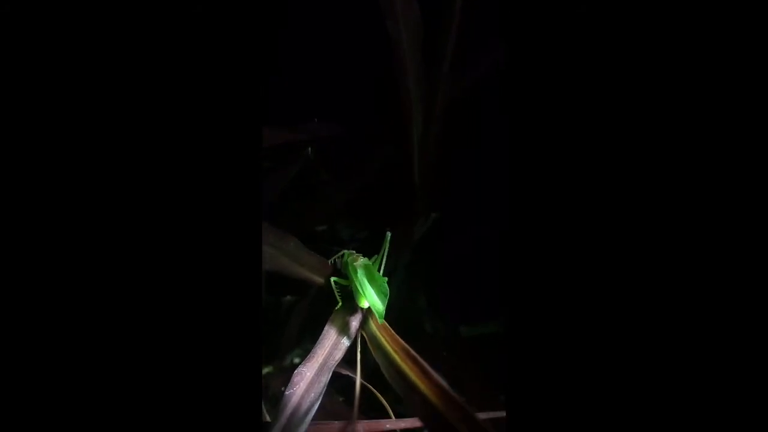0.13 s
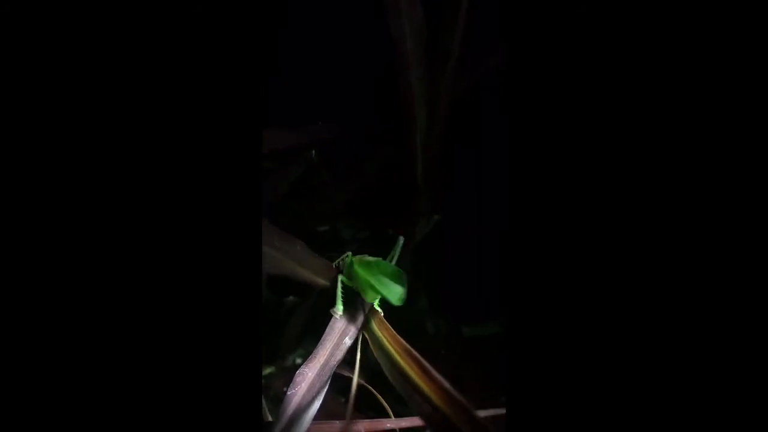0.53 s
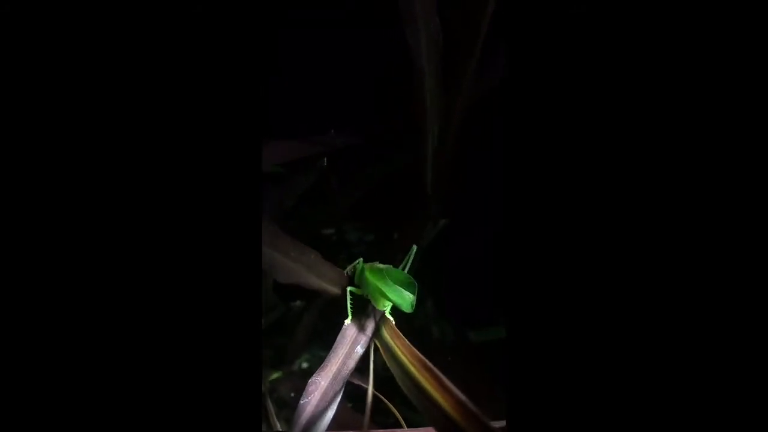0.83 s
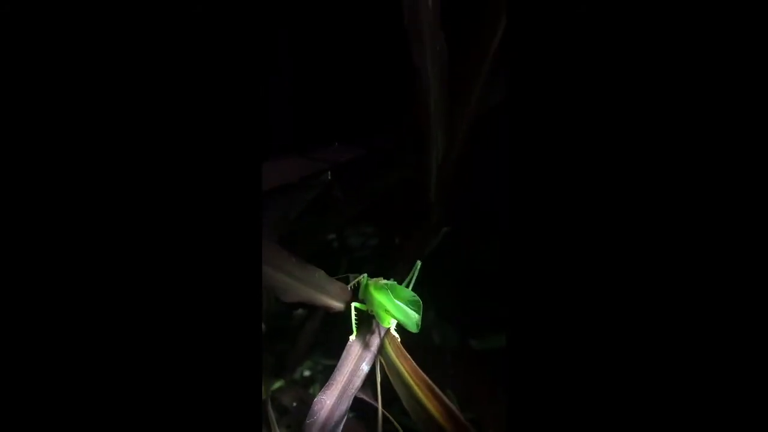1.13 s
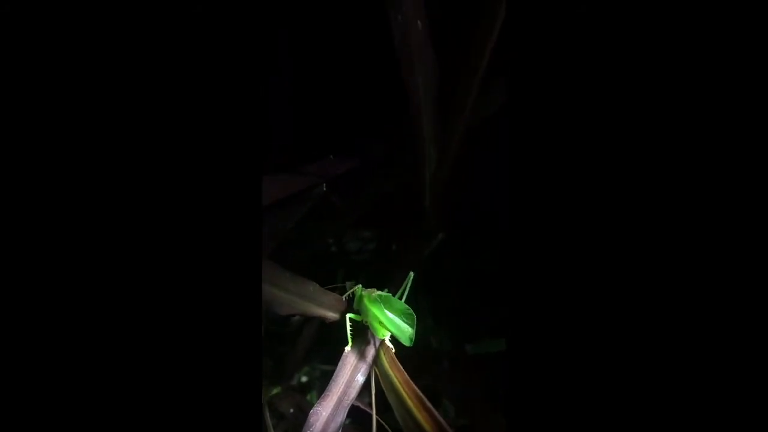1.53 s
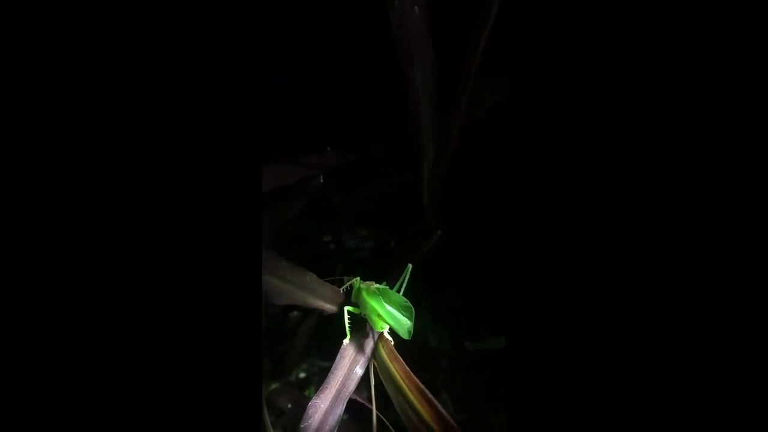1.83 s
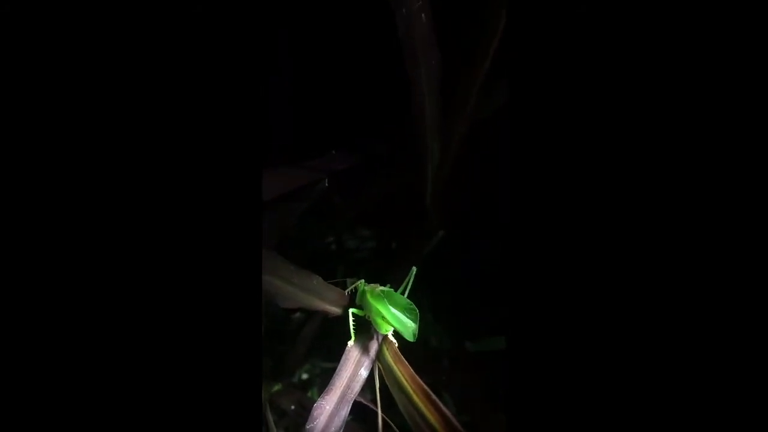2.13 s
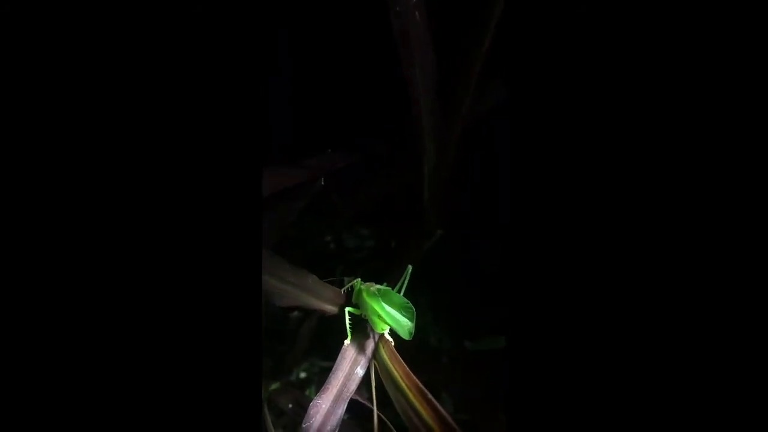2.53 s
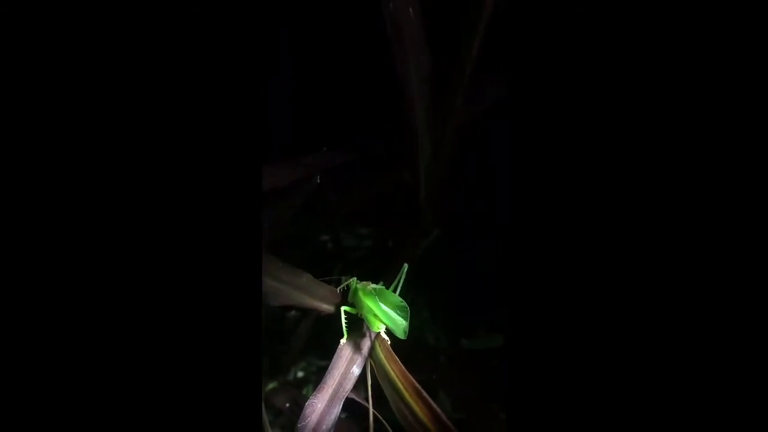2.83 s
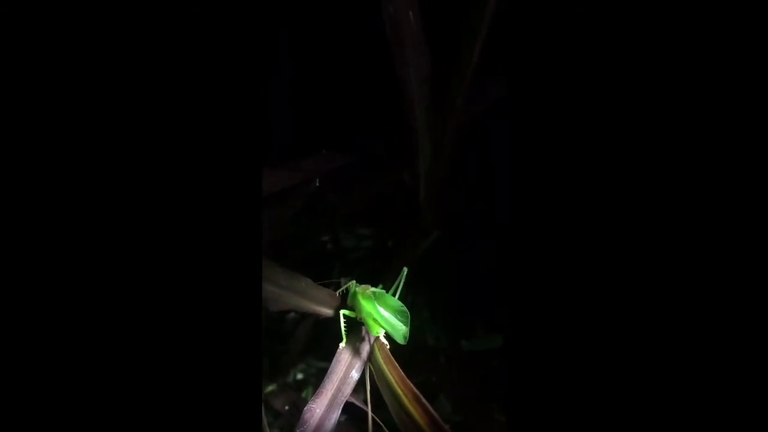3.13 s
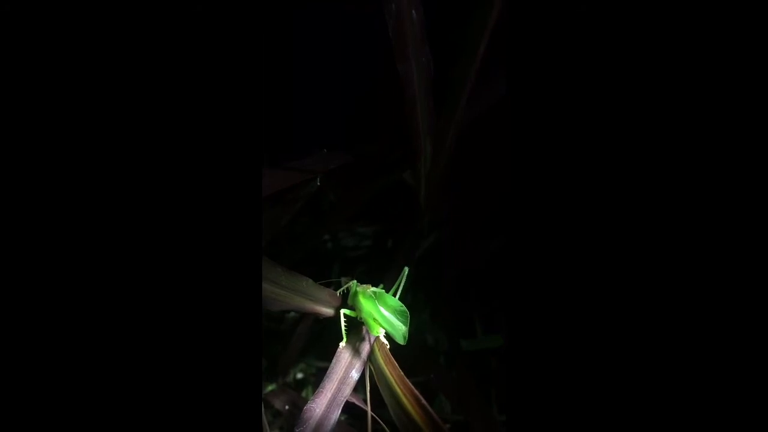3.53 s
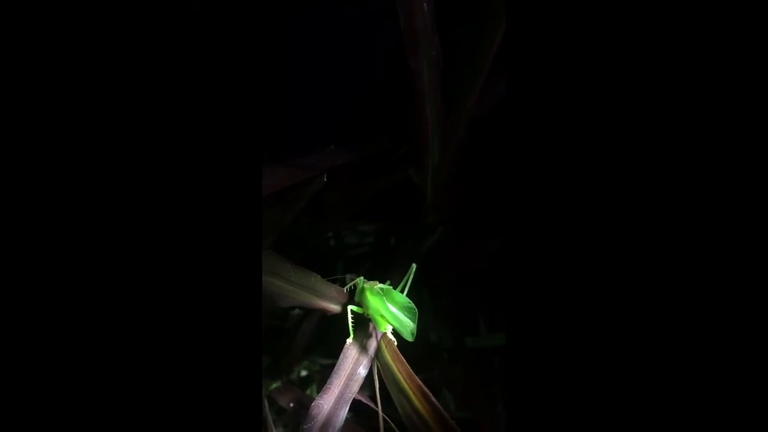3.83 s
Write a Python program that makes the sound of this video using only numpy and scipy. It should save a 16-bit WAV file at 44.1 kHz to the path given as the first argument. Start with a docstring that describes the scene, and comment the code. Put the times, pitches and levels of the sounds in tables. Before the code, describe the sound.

A bush cricket rasps close by at night, in five short, harsh, very high bursts at about 0.5, 1.3, 1.9, 2.5 and 3.1 seconds. Each scrape builds to a sharp ring, followed by tiny wing ticks. Faint distant insects trill over a low rumble and hum throughout, dipping with each rasp and swelling back. After a last tick near 3.4 seconds, only this background remains.

```python
"""A bush cricket on a leaf at night. From the outset, far insects trill over a low rumble and hum.
At half a second comes the first of five close rasps, each one wing stroke: the scraper skims the file,
bites and makes the wing ring tooth by tooth, then slips off the end. Automatic gain control ducks the
background with every rasp; the wings tick as they part and reset, and the background swells back.
After the last stroke, at about 3.2 seconds, and its ticks, the far insects and the rumble remain."""
import sys
import numpy as np
from scipy import signal
from scipy.fft import rfft, irfft, next_fast_len
from scipy.io import wavfile
from scipy.ndimage import uniform_filter1d, minimum_filter1d

SR = 44100
rng = np.random.default_rng(int(sys.argv[2]) if len(sys.argv) > 2 else 0)


def inscribe(sig):
    """Save sig as 16-bit PCM at rate SR to the path in sys.argv[1].

    A 1-D sig is mono; a 2-D sig holds one channel per row.
    Samples are clipped to [-1, 1] before scaling.
    """
    pcm = np.round(np.clip(np.atleast_2d(sig).T, -1, 1) * 32767)
    wavfile.write(sys.argv[1], SR, pcm.astype(np.int16))


N = 176400
T = np.arange(N) / SR

# Wing strokes. Each row: start, bite and end in seconds, teeth per second.
WING_STROKES = [(.505, .5782, .6385, 347.6), (1.341, 1.4138, 1.4798, 347.6),
                (1.9115, 1.9905, 2.0571, 344.4), (2.4815, 2.5658, 2.6245, 342.7),
                (3.0855, 3.1759, 3.2403, 342.8)]
# Course of a stroke. Each row: stage (0 start, 1 bite, 2 end), scrape in dB, ring in dB, pitch in Hz.
STROKE_COURSE = [(0, -27, -60, 6600), (.1, -20.5, -53.5, 6500), (.36, -14, -37, 6600),
                 (.65, -14.5, -38, 6400), (.88, -9, -29, 6270), (1.03, -7.5, -25.5, 7000),
                 (1.13, -2.5, -11.5, 9500), (1.22, -5.5, -10, 10300), (1.351, -9, 0.5, 11000),
                 (2, -4, 2, 11180)]
# Spectra of the wing's four kinds of contact. Each row: frequency in Hz, gain in dB.
SCRAPE_SPECTRUM = [(900, -16.5), (2100, -12.5), (3300, -15), (5000, -11), (6500, -5), (8000, -3.5),
                   (9500, 1.5), (11500, 3), (12800, 3.5), (14500, 6.5), (16000, 2)]
SNAP_SPECTRUM = [(1200, -32.5), (2800, -25.5), (4300, -17), (5800, -23), (7500, -18.5), (9500, 1.5),
                 (12000, -10), (12800, -13), (14000, 7.5), (15700, -3.5)]
SLIP_SPECTRUM = [(700, -24.5), (1400, -1.5), (3000, -7.5), (4500, -4.5), (7000, -30.5), (14000, -49)]
TICK_SPECTRUM = [(1500, -31.5), (3500, -32.5), (5200, -16), (6700, -15), (8000, -17), (9300, -6.5),
                 (11200, -6.5), (12800, -10), (14000, -2.5), (15200, 1.5), (16500, -5.5)]
# Wing ticks. Each row: time in seconds, then click, main resonance and low resonance in dB.
WING_TICKS = [(0.0127, 2.5, -27, -41), (.1515, 2, -16.5, -22), (.682, 6.5, -7, -53), (1.511, 3.5, -36, -45),
              (1.6432, 2.5, -15.5, -21.5), (2.0884, 3.5, -34, -45), (2.2317, 3, -15.5, -20),
              (2.6558, 3.5, -31, -55), (2.798, 2, -15, -21.5), (3.2694, 3, -38, -52),
              (3.4066, 1, -16, -21.5)]
# A second insect's trills. Each row: start and end in seconds, final level in dB.
SWELLING_TRILLS = [(-.18, .207, -62.5), (0.825, 1.217, -60), (1.897, 2.283, -60.5), (2.894, 3.365, -63)]
# A far tree cricket's trills. Each row: middle and length in seconds, level in dB.
SOFT_TRILLS = [(.24, .36, -63), (1.683, 0.36, -63.5), (2.904, 0.21, -62.5)]
# Far insect choirs and hum. Each row: centre and width in Hz, level and flutter in dB.
CHOIR_BANDS = [(3403, 280, -72.5, 2), (4546, 220, -70, 3)]
HUM_BANDS = [(51.9, 13.3, -48.5, 0.5), (107, 8.9, -42, 1), (131.65, 7, -42.5, 1.5), (205, 15, -48, 1.5)]
# Night air and distant rumble. Each row: frequency in Hz, relative spectral density in dB.
AIR_SPECTRUM = [(20, -37), (32, -49), (48, -1), (75, 1.5), (125, -2.5), (170, -5), (250, -7.5), (400, -20),
                (650, -19), (980, -14.5), (1250, -18.5), (1600, -19.5), (2200, -28.5), (3000, -39),
                (4000, -46.5), (6300, -48.5), (8500, -54.5), (12500, -56), (16000, -57)]

RING_S, RING_RISE_HZ = .00098, 1400   # length of one tooth's ring and its upward glide


def rasps(snap_db=2, slip_s=.0082, slip_db=-27.5):
    """Stridulation: each tooth scrapes, snaps free and rings the wing; a rough slip ends the stroke."""
    strokes = [tooth_strikes(*row) for row in WING_STROKES]
    friction = sum(scrapes(rows[:, 0] - RING_S / 2, rows[:, 1]) for rows in strokes)
    times, _, ring_db, hz = np.vstack(strokes).T
    snaps = place(times, ring_db + snap_db, click)
    rings = place(times, ring_db, wing_ring(hz[:, None]))
    slip_envelope = sum(np.exp(-(2 * (T - end) / slip_s) ** 2) for _, _, end, _ in WING_STROKES)
    slips = from_db(slip_db) * coloured(slip_envelope * rng.standard_normal(N), SLIP_SPECTRUM)
    return coloured(friction, SCRAPE_SPECTRUM) + coloured(snaps, SNAP_SPECTRUM) + rings + slips


def tooth_strikes(start, bite, end, rate, skim_slower=.06, run_out_db_per_s=2300):
    """Wing speed sets the tooth rate. Each row: time in seconds, scrape and ring in dB, pitch in Hz."""
    times = end - np.arange(-4, 60) / rate   # four teeth run on past the end, without ringing
    skim = np.clip((bite - times) / (bite - start), 0, 1)
    times -= .5 * skim_slower * (bite - start) * skim ** 2   # quickening until the bite
    jitter, scrape_spread, ring_spread = rng.standard_normal((3, len(times)))
    times += jitter * np.where(skim > 0, 1.2e-5, 6e-6)
    stage = np.interp(times, [start, bite, end], [0, 1, 2])
    stages, *curves = np.transpose(STROKE_COURSE)
    scrape_db, ring_db, hz = (np.interp(stage, stages, curve) for curve in curves)
    past_end = times > end + .5 / rate
    run_out_db = -3.5 - run_out_db_per_s * (times - end - 1 / rate)
    scrape_db = np.where(past_end, run_out_db, scrape_db) - scrape_spread
    ring_db = np.where(past_end, -np.inf, ring_db) - .5 * ring_spread
    return np.column_stack([times, scrape_db, ring_db, hz])[times > start]


def scrapes(times, db, drag_s=.003, fresh_share=.44):
    """Friction: each tooth drags out a noise burst, part common to the stroke and part its own."""
    t = T[:256]
    window = np.sin(np.pi * np.minimum(t / drag_s, 1) ** .36) ** 2
    window /= np.linalg.norm(window)
    phases = np.angle(rfft(window * rng.standard_normal(len(t))))
    grain = irfft(np.exp(1j * phases), len(t)) * window ** .5
    strikes = place(times, db, click)
    common = signal.oaconvolve(strikes, grain / np.linalg.norm(grain))[:N]
    fresh = signal.oaconvolve(strikes, window)[:N] * rng.standard_normal(N)
    return np.sqrt(1 - fresh_share) * common + np.sqrt(fresh_share) * fresh


def wing_ring(hz):
    """Resonance: the struck wing gives a brief rising tone, returned as a function of time."""
    def shape(t):
        envelope = np.cos(np.pi * np.clip(t / RING_S, -.5, .5)) ** 3
        return envelope * np.sin(2 * np.pi * t * (hz + .5 * RING_RISE_HZ * t / RING_S))
    return shape


def click(t):
    """A sharp contact approximates an impulse, with a flat spectrum."""
    return np.sinc(t * SR) * np.exp(-(t * SR / 10) ** 2)


def wing_ticks(main_hz=11100, low_hz=7060):
    """Impact excitation: single contacts ring two resonances as the wings part and settle."""
    times, click_db, main_db, low_db = np.transpose(WING_TICKS)
    contacts = coloured(place(times, click_db, click), TICK_SPECTRUM)
    return contacts + place(times, main_db, wing_ring(main_hz)) + place(times, low_db, wing_ring(low_hz))


def among_leaves(x):
    """Scattering: the nearest leaves add a short tail, the foliage a faint longer one."""
    t = T[:SR // 2]
    response = 1. * (t == 0)
    for db, t60_s in (-13.5, .0099), (-39, .22):
        tail = rng.standard_normal(len(t)) * from_db(-60 * t / t60_s) * (t > RING_S)
        response += from_db(db) * tail / np.linalg.norm(tail)
    return signal.fftconvolve(x, response)[:N]


def swelling_trills(swell_db=16.5, octave_db=-20):
    """Amplitude modulation: a fast-pulsed tone and its octave swell exponentially and stop dead."""
    pulses, phase = falling_notes(hz=7340, fall_hz=450, per_s=182, waver=.015, duty=.98)
    swell = np.zeros(N)
    for start, end, db in SWELLING_TRILLS:
        remaining = np.clip((end - T) / (end - start), 0, 1)
        swell += from_db(db - swell_db * remaining) * (T > start) * (T < end)
    return swell * pulses * rms_one(np.sin(phase) + from_db(octave_db) * np.sin(2 * phase))


def far_cricket(db=-69):
    """Random amplitude modulation makes a train of soft falling chirps uneven."""
    notes, phase = falling_notes(hz=4604, fall_hz=645, per_s=18, waver=.08, duty=.75)
    return from_db(db) * rms_one(notes * np.sin(phase) * from_db(2 * drift(8.7)))


def tree_cricket(waver_hz=109):
    """Random frequency modulation broadens the tone of soft trills that fade in and out."""
    pulses, phase = falling_notes(hz=4630, fall_hz=250.4, per_s=38, waver=.101, duty=1)
    phase += 2 * np.pi * np.cumsum(waver_hz * drift(115.6)) / SR
    level = sum(from_db(db) * np.exp(-(2 * (T - middle) / length) ** 4)
                for middle, length, db in SOFT_TRILLS)
    return level * rms_one(np.sqrt(pulses) * np.sin(phase))


def falling_notes(hz, fall_hz, per_s, waver, duty):
    """Envelope and phase of repeated downward glides; phase is the integral of frequency."""
    cycles = np.cumsum(per_s * (1 + waver * drift(3))) / SR
    progress = np.minimum(cycles % 1 / duty, 1)
    pitch = hz + fall_hz * (.5 - progress) + .008 * hz * drift(150)
    return rms_one(np.sin(np.pi * progress) ** 2), 2 * np.pi * np.cumsum(pitch) / SR


def night(air_db=-38.5, hiss_db=-60):
    """Incoherent addition: massed insects merge into noise bands over the air and distant hum."""
    air = from_db(air_db) * rms_one(coloured(rng.standard_normal(N), AIR_SPECTRUM))
    bands = np.zeros(N)
    for hz, width, db, flutter_db in CHOIR_BANDS + HUM_BANDS:
        band = noise_band(hz - width / 2, hz + width / 2)
        bands += from_db(db) * rms_one(band * from_db(flutter_db * drift(7.5)))
    bush_crickets = from_db(hiss_db + .23 * drift(60)) * noise_band(9560, 11160, order=4)
    return air + bands + bush_crickets


def noise_band(low_hz, high_hz, order=2):
    """Band-pass filtering of white noise, at unit rms."""
    sos = signal.butter(order, [low_hz, high_hz], "band", fs=SR, output="sos")
    return rms_one(signal.sosfilt(sos, rng.standard_normal(N + SR))[SR:])


def drift(rate_hz):
    """Low-pass filtered noise wanders slowly, with a spread of about 1."""
    pole = np.exp(-80 * np.pi * rate_hz / SR)   # one step per 40 samples
    slow = signal.lfilter([1], [1, -2 * pole, pole * pole], rng.standard_normal(N // 40 + 2002))[2000:]
    return np.interp(np.arange(N) / 40, np.arange(len(slow)), rms_one(slow))


def coloured(x, spectrum):
    """Minimum-phase filtering: folding the cepstrum makes the given spectrum causal."""
    hz, db = np.transpose(spectrum)
    size = next_fast_len(N + SR // 2, real=True)
    bin_hz = np.maximum(np.arange(size // 2 + 1) * SR / size, 1)
    gain = from_db(np.interp(np.log(bin_hz), np.log(hz), db))
    cepstrum = irfft(np.log(gain), size)
    cepstrum[1:size // 2] *= 2
    cepstrum[size // 2 + 1:] = 0
    return irfft(rfft(x, size) * np.exp(rfft(cepstrum)), size)[:N]


def place(times, db, shape):
    """Superposition of a short shape (a function of seconds from its centre) at exact times."""
    index = (times * SR).astype(int)[:, None] + np.arange(-64, 64)
    waves = from_db(db)[:, None] * shape(index / SR - times[:, None])
    return np.bincount(np.clip(index, 0, N).ravel(), waves.ravel(), N + 1)[:N]


def from_db(db):
    """Amplitude grows tenfold with every 20 dB."""
    return 10 ** (np.asarray(db) / 20)


def rms_one(x):
    """Normalisation to unit rms."""
    return x / np.sqrt(np.mean(x ** 2) + 1e-20)


def scene():
    """Superposition of the near bush cricket, the far insects and the night."""
    bush_cricket = among_leaves(rasps() + wing_ticks())
    return (bush_cricket + swelling_trills() + far_cricket() + tree_cricket() + night())[None]


def record(dry, limit_db=-3, attack_s=.001, hold_s=.17, release_db_per_s=134):
    """Limiting: the gain drops at each rasp, holds and recovers; a steep low-pass cuts the top."""
    split_hz, low_share, cutoff_hz = 9000, .62, 15800   # the low band takes only a share of the cut
    x, hold = dry[0], int(hold_s * SR) // 2 * 2 + 1
    over_db = np.maximum(20 * np.log10(np.abs(x) + 1e-9) - limit_db, 0)
    held_db = -minimum_filter1d(-over_db, hold, origin=hold // 2, mode="constant")
    held_db = np.maximum(held_db, 3.5 * (T < .16))   # the gain starts out held down
    cut_db = np.maximum.accumulate(held_db + release_db_per_s * T) - release_db_per_s * T
    cut_db = uniform_filter1d(cut_db, int(attack_s * SR) + 1)
    low = signal.sosfiltfilt(signal.butter(2, split_hz, fs=SR, output="sos"), x)
    ducked = low * from_db(-low_share * cut_db) + (x - low) * from_db(-cut_db)
    return signal.sosfilt(signal.ellip(10, .2, 80, cutoff_hz, fs=SR, output="sos"), ducked)[None]


dry = scene()
out = record(dry)
inscribe(out)
```